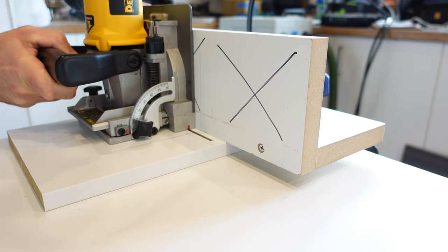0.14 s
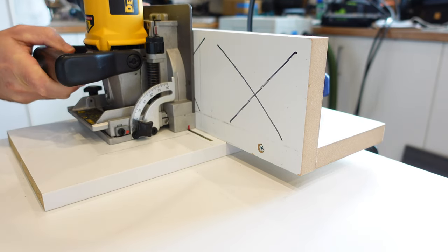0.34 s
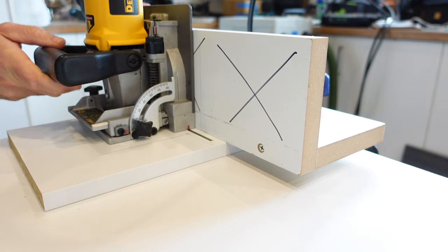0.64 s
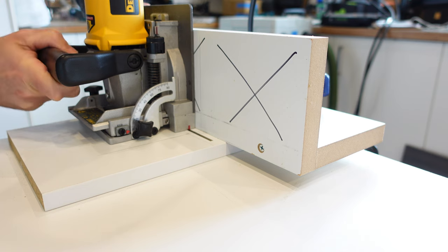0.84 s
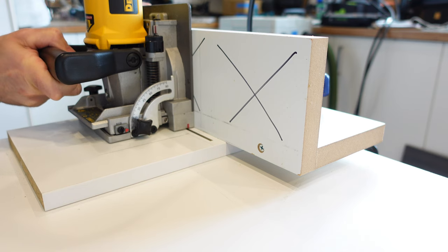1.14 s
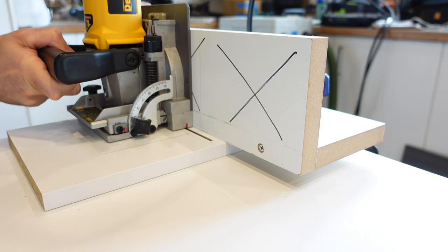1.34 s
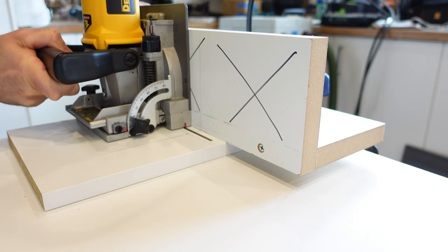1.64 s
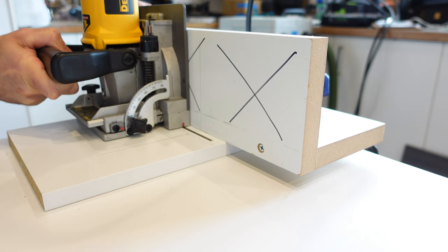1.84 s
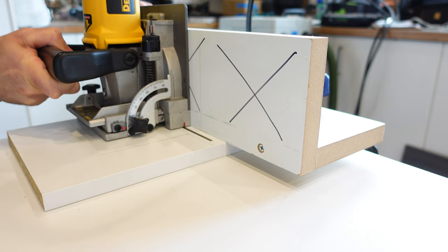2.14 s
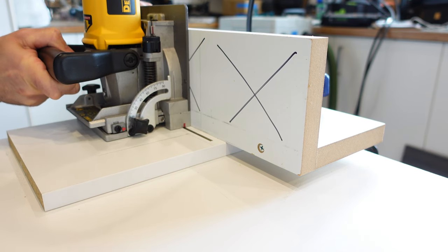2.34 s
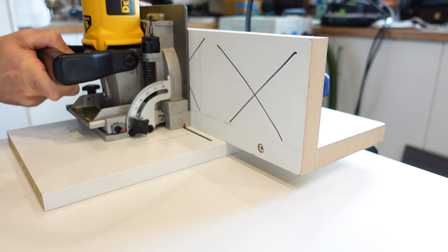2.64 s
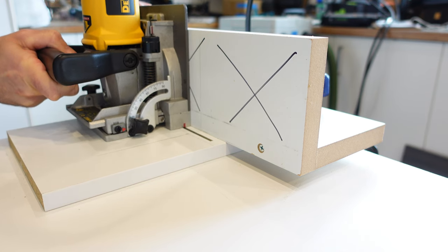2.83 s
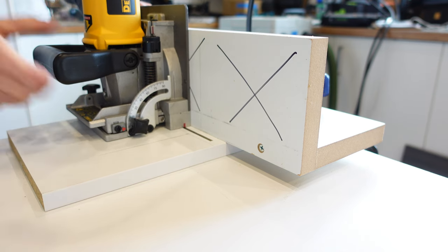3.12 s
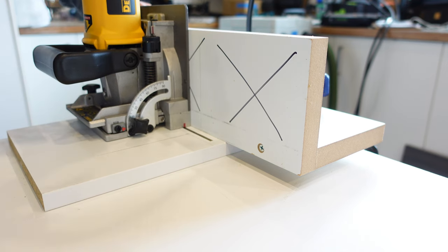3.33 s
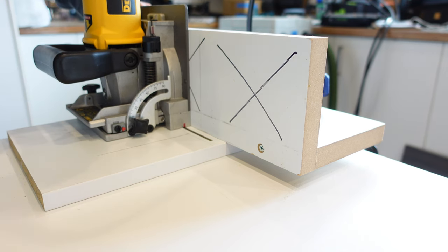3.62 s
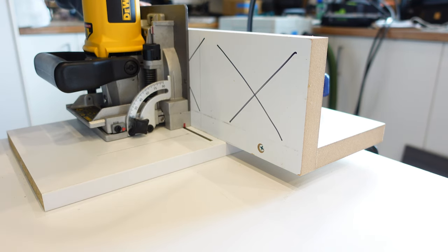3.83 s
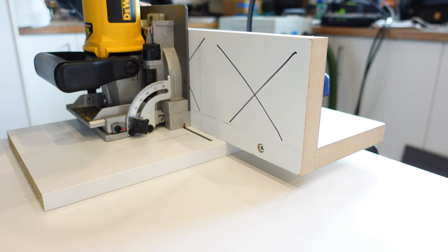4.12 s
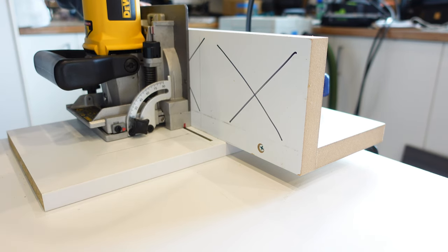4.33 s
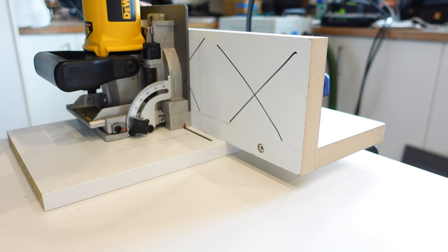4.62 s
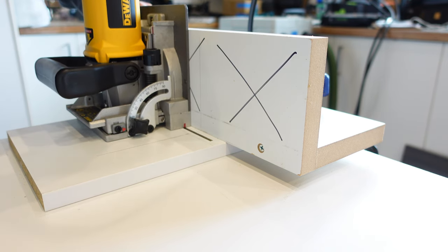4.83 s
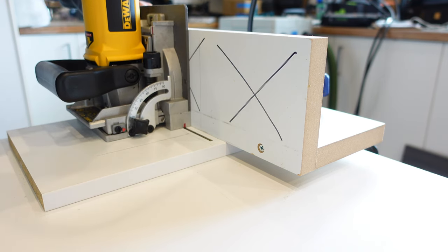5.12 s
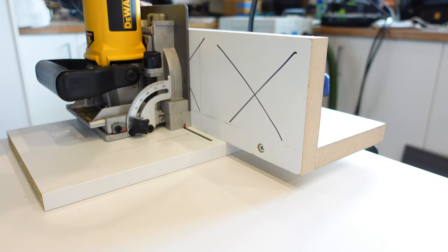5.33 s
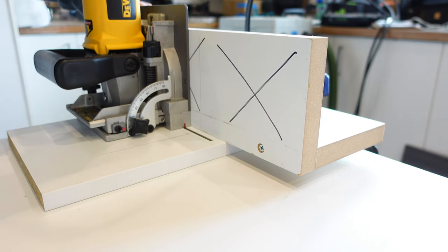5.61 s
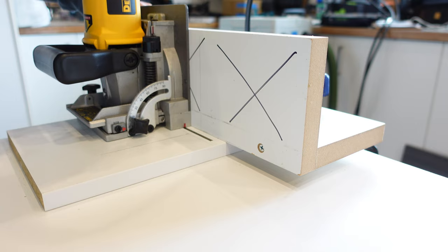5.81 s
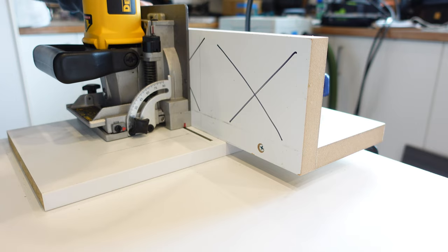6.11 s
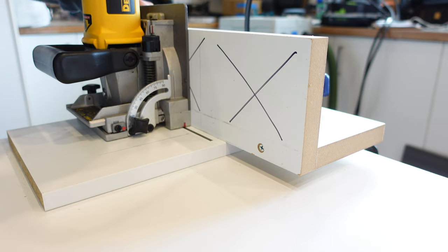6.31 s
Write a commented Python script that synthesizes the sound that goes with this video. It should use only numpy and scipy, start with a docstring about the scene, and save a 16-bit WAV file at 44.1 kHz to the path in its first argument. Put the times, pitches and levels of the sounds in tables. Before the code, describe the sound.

A biscuit jointer is handled with soft knocks and clicks, then runs briefly with a rushing whine before winding down.

```python
"""A biscuit jointer stands on a board in a small workshop. A hand shifts its grip, knocks the tool
lightly and slides off; each impact excites the modes of tool and board. At 4.2 s the switch snaps:
the motor jerks the gears, and the blade whines up to speed in rushing air and brush hiss.
From 4.5 s a dust extractor winds up behind it. At 5.7 s the power is cut and the blade coasts
down, its pitch falling as the gears go slack and chatter."""
import sys
import numpy as np
from scipy import signal
from scipy.fft import rfft, irfft, next_fast_len
from scipy.io import wavfile
from scipy.ndimage import uniform_filter1d, map_coordinates

SR = 44100
rng = np.random.default_rng(int(sys.argv[2]) if len(sys.argv) > 2 else 0)


def wav_out(sig):
    """Save sig, one row per channel (or a flat mono array), as 16-bit PCM at SR to the path in sys.argv[1]."""
    wavfile.write(sys.argv[1], SR, np.round(np.clip(np.atleast_2d(sig).T, -1, 1) * 32767).astype(np.int16))


N = 284886
START_S, CUT_S = 4.216, 5.67  # power on, power off
NOISE_BUILD_S = 0.044  # rise of fan noise and chatter after the switch


def amp(db):
    """Decibels to amplitude ratio."""
    return 10 ** (np.asarray(db) / 20)


def unit(x):
    """Normalise to rms 1."""
    return x / np.sqrt(np.mean(x ** 2) + 1e-20)


def along(points, hz):
    """Interpolate (frequency, value) points on a logarithmic axis."""
    f, v = np.transpose(points)
    return np.interp(np.log(hz + 1), np.log(f + 1), v)


def clock():
    """The time of every sample [s]."""
    return np.arange(N) / SR


def since(start):
    """Seconds elapsed after start, zero before."""
    return np.maximum(clock() - start, 0)


def ramp(start, length):
    """Linear rise from 0 to 1 over length seconds."""
    return np.clip((clock() - start) / length, 0, 1)


def wobble(rate):
    """Random modulation: a spline through rate knots a second."""
    coarse = clock()[::16]
    knots = rng.standard_normal(int(N * rate / SR) + 4)
    return np.interp(clock(), coarse, map_coordinates(knots, [coarse * rate]))


def filtered(x, response):
    """Linear filtering: the spectrum of x times a frequency response."""
    size = next_fast_len(N + SR // 2)
    return irfft(rfft(x, size) * response(np.fft.rfftfreq(size, 1 / SR)), size)[:N]


def resonances(peaks, hz):
    """Gain of Lorentzian peaks that add in power."""
    return np.sqrt(sum((amp(db) / (1 + ((hz - centre) / width) ** 2)) ** 2
                       for centre, width, db in peaks))


def rush(spectrum, patchy_db):
    """Coloured noise of rms 1, modulated in random patches of time and frequency."""
    z = signal.stft(rng.standard_normal(N), nperseg=512)[2]
    patches = uniform_filter1d(rng.standard_normal(z.shape), size=5, axis=0)
    patches = uniform_filter1d(patches, size=9, axis=1)
    noise = signal.istft(z * amp(patchy_db * unit(patches)), nperseg=512)[1][:N]
    return unit(filtered(noise, lambda hz: amp(along(spectrum, hz))))


def blow(damping, crack_db, crack_t60):
    """Impulse response of tool and board: damped modes of random strength, and a short crack."""
    # modes (frequency [Hz], level [dB], t60 before division by damping [s])
    modes = [(133, 5, 0.6), (139, -0.5, 0.29), (241, 4.5, 0.087), (285, -28, 0.043), (386, 2, 0.023),
             (530, -8.5, 0.047), (638, 5.5, 0.027), (791, 0, 0.06), (806, -2.5, 0.027), (1195, 7.5, 0.036),
             (1514, 9.5, 0.023), (1737, -8.5, 0.066), (1960, -13, 0.031), (2330, 2, 0.042),
             (2810, -2, 0.044), (3690, 5.5, 0.0071), (4180, 3.5, 0.026), (4600, 4.5, 0.028),
             (5060, 17, 0.018), (5460, -24, 0.014), (7720, 1, .03), (8800, 3, 0.032)]
    t = np.arange(SR // 4) / SR
    ring = 0
    for hz, db, t60 in modes:
        envelope = amp(db + rng.normal(0, 3) - 60 * t * damping / t60) * rng.choice([-1, 1])
        ring += envelope * np.sin(2 * np.pi * hz * rng.normal(1, 0.031) * t)
    crack = signal.lfilter([1], [1, -.6], rng.standard_normal(len(t)))
    return ring + amp(crack_db - 60 * t / crack_t60) * crack


def impacts(rate, scatter_db, **contact):
    """Shot noise: randomly timed, uneven impulses excite tool and board."""
    pulses = (rng.random(N) < rate / SR) * amp(scatter_db * np.clip(rng.standard_normal(N), -2, 2))
    return signal.fftconvolve(pulses, blow(**contact))[:N]


def background():
    """Ambient noise of the workshop: steady and broadband."""
    # noise spectrum (frequency [Hz], relative density [dB])
    spectrum = [(25, -48), (60, -8), (120, 0.5), (300, -2.5), (800, -6.5), (2000, -17.5), (6000, -23),
                (16000, -32)]
    return amp(-74) * rush(spectrum, patchy_db=.8)


def reverberation(x):
    """The workshop's diffuse field decays exponentially, each frequency at its own rate."""
    # reverberation times (frequency [Hz], t60 [s])
    decay_times = [(100, 0.54), (260, 0.45), (700, 0.25), (2000, 0.21), (5000, 0.25), (14000, 0.074)]
    hz, t, z = signal.stft(rng.standard_normal(SR // 2), SR, nperseg=256)
    tail = signal.istft(z * amp(-60 * t / along(decay_times, hz)[:, None]), SR, nperseg=256)[1]
    return signal.fftconvolve(x, np.pad(tail, (SR // 200, 0)) / np.linalg.norm(tail))[:N]


def extractor():
    """Rotational tone: the dust extractor's turbine radiates its shaft rate and the octave."""
    # shaft tone before the fade-in (time [s], level [dB])
    levels = [(4.85, -73), (4.97, -44.5), (5.1, -45.5), (6.05, -48.5), (6.46, -39)]
    start_s, spin_up_s, full_hz = 4.519, .349, 605
    shaft_db = np.interp(clock(), *np.transpose(levels))
    shaft_hz = full_hz * (1 - np.exp(-since(start_s) / spin_up_s))
    phase = 2 * np.pi * np.cumsum(shaft_hz * (1 + 0.0014 * wobble(24.44))) / SR
    tone = np.sin(phase) + amp(-10) * np.sin(2 * phase)
    return ramp(start_s, spin_up_s) * amp(shaft_db + 2 * wobble(17)) * tone


def strokes():
    """Grainy band noise in Gaussian swells: strokes of skin, sleeve and metal, booms of the board."""
    # swells (peak time [s], time spread [s], centre [Hz], band spread [octaves], level [dB])
    swells = [(0.117, 0.009, 2660, 0.38, -57.5), (0.32, 0.11, 4020, 0.33, -70),
              (1.282, 0.016, 3300, 0.74, -56.5), (1.321, 0.0048, 1630, .12, -37),
              (1.35, 0.065, 1640, 0.26, -63.5), (1.769, 0.021, 1100, 1.1, -64),
              (1.996, .029, 140, .35, -55), (2.385, 0.023, 440, 0.69, -72), (2.655, .025, 134, .37, -59),
              (2.949, 0.039, 740, 0.64, -62), (2.985, 0.026, 147, 1.04, -58),
              (3.2, 0.051, 6000, 0.47, -73.5), (3.81, 0.02, 2780, 0.37, -65)]
    out = np.zeros(N + SR)
    t = np.arange(SR) / SR
    hz = np.fft.rfftfreq(SR, 1 / SR)
    for peak_s, spread_s, centre_hz, octaves, db in swells:
        grains = rng.standard_normal(SR) * amp(2.5 * np.repeat(rng.standard_normal(SR // 50), 50))
        passband = np.exp(-.5 * (np.log2((hz + 1) / centre_hz) / octaves) ** 2)
        band = unit(irfft(rfft(grains) * passband, SR))
        start = max(peak_s - .5, 0)
        envelope = np.exp(-.5 * ((t + start - peak_s) / spread_s) ** 2)
        out[round(start * SR):][:SR] += amp(db) * band * envelope
    return out[:N]


def hand():
    """Stick-slip friction: skin drags and bumps over the hollow handle; the sleeve swishes along."""
    # hand moves (start [s], length [s], rub level [dB], bump weight [dB], swish weight [dB])
    moves = [(-0.05, 0.46, -56.5, -4.5, -6), (0.434, 0.41, -64.5, -2.5, -8.5),
             (0.9, 0.86, -63.5, -0.5, -11.5), (1.733, 0.27, -61, 4.5, -12), (2.774, 0.29, -71, 0, -1.5),
             (3.128, 0.33, -72, 9.5, 4.5), (3.346, 0.33, -70, 5, 6.5), (3.745, 0.08, -64.5, 7, 0.5),
             (3.86, 0.42, -74, 4.5, 0.5)]
    # spectra of bumping, rubbing and swishing (frequency [Hz], relative density [dB])
    bump_spectrum = [(25, -42), (55, -42), (85, -29), (105, -0.5), (140, -2.5), (200, -1), (350, -4.5),
                     (550, -7.5), (1200, -67)]
    rub_spectrum = [(200, -14), (400, 2), (600, 3), (790, 6), (1000, -1), (1400, -6.5), (2000, -14),
                    (4000, -62)]
    swish_spectrum = [(800, -18), (1600, 1.5), (2400, 1), (3800, 0), (6000, -9), (8000, -14),
                      (11000, -19.5), (16000, -35)]
    attack_s, release_s = 0.034, 0.083
    rubbing = bumping = swishing = 0
    for start, length, db, bump_db, swish_db in moves:
        move = amp(db) * ramp(start, attack_s) * np.exp(-since(start + length) / release_s)
        rubbing = np.hypot(rubbing, move)  # incoherent sounds add in power
        bumping = np.hypot(bumping, amp(bump_db) * move)
        swishing = np.hypot(swishing, amp(swish_db) * move)
    slips = unit(impacts(rate=90, scatter_db=6.5, damping=5.1, crack_db=1, crack_t60=0.0027))
    bump = bumping * amp(-3 + 0.89 * wobble(33)) * rush(bump_spectrum, patchy_db=2.5)
    rub = rubbing * (rush(rub_spectrum, patchy_db=4) + amp(-23) * slips)
    swish = swishing * amp(-5 + 0.66 * wobble(27.25)) * rush(swish_spectrum, patchy_db=-1)
    return bump + rub + swish


def knocks():
    """Impact excitation: soft contacts thump the board, hard ones reach the metal's high modes."""
    # knocks, clicks and the switch (time [s], level [dB], centre [Hz], fall to each side [dB/octave])
    contacts = [(0.115, -53, 1790, 6), (0.83, -58.5, 1030, 9), (0.847, -38.5, 670, 6.5),
                (0.873, -64, 530, 9.0), (0.931, -55, 1690, 11), (0.968, -51, 1390, 4),
                (1.033, -60.5, 660, 12), (1.061, -62.5, 690, 13), (1.138, -36, 680, 9.5),
                (1.155, -50, 3900, 4), (1.223, -56, 760, 10), (1.264, -40.5, 1630, 10.5),
                (1.315, -38.5, 1490, 12.5), (1.488, -59.5, 740, 8.5), (1.635, -43, 1060, 7),
                (1.714, -58.5, 600, 7), (1.811, -44, 490, 14), (1.901, -59, 5480, 10),
                (1.954, -51.5, 870, 4.5), (1.96, -37.5, 420, 11), (2.375, -60, 240, 5.5),
                (2.624, -45.5, 385, 8.5), (2.749, -61.5, 230, 4.0), (2.844, -61.5, 1000, 3),
                (2.953, -54, 400, 6.5), (3.396, -58.5, 260, 9), (3.434, -58.5, 520, 2.5),
                (3.714, -45, 395, 7.0), (4.175, -64, 480, 3.5), (4.208, -39, 3400, 6),
                (4.2125, -28.5, 1800, 6.5)]
    # how well the tool radiates a knock (frequency [Hz], gain [dB])
    radiation = [(120, 6), (280, -0.3), (630, 2.4), (1380, 0.0), (2830, -0.5), (5480, 0.5), (10250, -8)]
    # loose parts settling after a knock (frequency [Hz], level relative to the knock [dB])
    loose_parts = [(130, -6), (280, -14), (650, -19), (1800, -11.5), (10000, -28)]
    # edges of the bands that shape a knock (frequency [Hz])
    edges = [80, 190, 420, 950, 2000, 4000, 7500, 12500]
    build_cycles, strike_s, settle_t60 = 1.27, 0.016, 0.27
    bands = list(zip(edges, edges[1:]))
    filters = [signal.butter(2, band, "bandpass", fs=SR, output="sos") for band in bands]
    band_hz = np.sqrt(np.prod(bands, axis=1))
    out = np.zeros(N + SR)
    for start, db, centre_hz, fall in contacts:
        hit = blow(damping=2.13, crack_db=10.5, crack_t60=0.012)
        t = np.arange(len(hit)) / SR
        # the softer the contact, the longer the tool takes to get moving
        hit *= 1 - np.exp(-(t * centre_hz / build_cycles) ** 2)
        levels = db - fall * np.abs(np.log2(band_hz / centre_hz)) + along(radiation, band_hz)
        for sos, hz, level in zip(filters, band_hz, levels):
            strike = signal.sosfilt(sos, hit)
            strike *= np.sqrt(strike_s * SR) / np.linalg.norm(strike)  # energy of rms 1 for strike_s
            noise = unit(signal.sosfilt(sos, rng.standard_normal(len(t))))
            settling = amp(along(loose_parts, hz) - 60 * t / settle_t60) * noise
            out[round(start * SR):][:len(t)] += amp(level) * (strike + settling)
    return out[:N]


def drive():
    """First-order run-up and frictional decay: tooth rate [Hz]; torque, coasting, gear slack [0-1]."""
    spin_from_s, spin_up_s, coast_from_s, coast_s = 4.193, .1594, 5.72, 1.418
    running_hz, creep_hz_per_s = 783.7, 74.5
    powered_s = np.clip(clock(), spin_from_s, coast_from_s) - spin_from_s
    torque = np.exp(-powered_s / spin_up_s)  # falls as the motor gains speed
    run_down = np.exp(-since(coast_from_s) / coast_s)
    tooth_hz = (running_hz * (1 - torque) + creep_hz_per_s * powered_s) * run_down
    coasting = ramp(CUT_S, length=.2)  # the load leaves the gears
    slack = ramp(start=6.015, length=0.46)
    return tooth_hz, torque, coasting, slack


def mains_ripple():
    """Oscillation at twice the mains frequency, until the power is cut."""
    return (clock() < CUT_S) * np.sin(2 * np.pi * 100 * clock())


def rattle():
    """Backlash: gear teeth slap across their play, loudest on run-up."""
    # transmission of chatter through the housing (frequency [Hz], gain [dB])
    transmission = [(30, -45), (200, -33), (450, 6), (900, -5), (3200, 2), (6000, -13.5), (9500, -4.5),
                    (13000, -7.5), (16000, -28)]
    _, _, coasting, slack = drive()
    unseated = 1 - ramp(start=4.49, length=0.19)
    # softens when the power is cut, then returns to about its running level as the gears slow
    rattle_db = -47 + 10.5 * unseated - 5.5 * coasting + 5 * slack ** 2
    slaps = sum(impacts(rate=80, scatter_db=3.5, damping=5, crack_db=11, crack_t60=.005)
                for _ in range(4))
    chatter = unit(filtered(slaps, lambda hz: amp(along(transmission, hz))))
    return ramp(START_S, NOISE_BUILD_S) * amp(rattle_db) * chatter


def brushes():
    """Sliding friction: brushes scrape the commutator, surge with the mains and make the metal sing."""
    # brush hiss (frequency [Hz], relative density [dB])
    spectrum = [(2500, -32), (4200, 1.5), (4700, 2), (5400, 1), (6100, 2.5), (6600, -4.5), (7500, -4.5),
                (8200, -8), (9300, -8.5), (10300, -13.5), (12300, -19), (13200, -25), (14500, -21.5),
                (16000, -34)]
    # resonances of metal parts (frequency [Hz], half-width [Hz], gain [dB])
    metal_modes = [(5420, 160, -9), (6030, 40, 6), (7620, 50, -9), (8850, 240, -3), (9515, 70, 0),
                   (11610, 130, -6), (12400, 110, -11)]
    fade_s = 0.31
    torque = drive()[1]
    hiss_db = -41.5 - 11.5 * torque - 8.5 * ramp(CUT_S - fade_s / 3, fade_s)
    ringing = unit(filtered(rng.standard_normal(N), lambda hz: resonances(metal_modes, hz)))
    singing = amp(-2 - 6.5 * since(START_S)) * ringing
    surge = 1 + 0.3 * mains_ripple()
    sparking_db = (.5 + 1.04 * (clock() < CUT_S)) * wobble(120)
    return amp(hiss_db + sparking_db) * surge * (rush(spectrum, patchy_db=1) + singing)


def windage():
    """Turbulence: blade and fan churn the air into noise, which turns duller when the motor coasts."""
    # churned air, driven fan and coasting fan (frequency [Hz], relative density [dB])
    air_spectrum = [(25, -53), (65, -63), (110, -24), (250, -13.5), (380, -9), (480, -5.5), (620, 0),
                    (800, 6), (950, -2.5), (1200, -17.5), (2000, -24), (4000, -72)]
    driven_spectrum = [(600, -33), (1000, -1), (1350, -1.5), (1650, -1.5), (2050, -6.5), (2500, -2),
                       (2850, 2), (3350, 3), (3800, -4), (4300, -13), (5500, -4.5), (9000, -72)]
    coasting_spectrum = [(600, -22), (1000, -1), (1250, 3.5), (1650, 0), (2000, -8), (2500, -5.5),
                         (2950, -1), (3400, -3), (3900, -12), (4400, -8.5), (5500, -12.5), (9000, -70)]
    _, torque, coasting, slack = drive()
    kick = np.exp(-np.abs(clock() - START_S) / 0.016)  # the motor's first jerk
    swell = np.exp(-((clock() - 5.42) / 0.66) ** 2)  # the roar grows at full speed
    air_db = -39.5 - 3.5 * torque - 3.5 * coasting + 6 * slack + 16.5 * kick
    fan_db = -36.5 - 4.5 * torque - 1.5 * coasting + 5.5 * slack + 2 * swell
    air = amp(air_db + 0.41 * wobble(35)) * rush(air_spectrum, patchy_db=0.5)
    fan = np.sqrt(1 - coasting) * rush(driven_spectrum, patchy_db=0.53)
    fan += amp(-3.5) * np.sqrt(coasting) * rush(coasting_spectrum, patchy_db=1.8)
    return air + np.sqrt(ramp(START_S, NOISE_BUILD_S)) * amp(fan_db + wobble(60)) * fan


def tooth_phase():
    """Phase as the integral of tooth rate; the shaft judders under the first surge of torque."""
    judder = .0005 + .1 * np.exp(-np.abs(clock() - START_S) / .055)
    return 2 * np.pi * np.cumsum(drive()[0] * (1 + judder * wobble(200))) / SR


def partial(phase, db, flutter):
    """A sinusoid modulated in amplitude and phase by turbulence."""
    in_phase = (1 + flutter * wobble(70)) * np.sin(phase)
    quadrature = flutter * wobble(70) * np.cos(phase)
    return np.sqrt(2) * amp(db) * (in_phase + quadrature)


def unbalance(phase):
    """Rotating unbalance: the six-toothed blade and the armature each vibrate once per turn."""
    tooth_hz = drive()[0]
    blade = partial(phase / 6, db=-67.5, flutter=0.48)
    armature = partial(7 / 13 * phase, db=-53, flutter=0.42)
    return (tooth_hz / tooth_hz.max()) ** 6 * (blade + armature)


def gear_mesh(phase):
    """Forced vibration: meshing at seven times the tooth rate sweeps through the case's resonances."""
    # gear case resonances (frequency [Hz], half-width [Hz], level [dB])
    case_modes = [(1750, 450, -35), (2950, 200, -34), (4200, 250, -56), (5280, 250, -41.5),
                  (5700, 600, -58), (6035, 50, -44), (6250, 90, -52)]
    tooth_hz, _, coasting, slack = drive()
    loaded_db = 20 * np.log10(resonances(case_modes, 7 * tooth_hz))
    mesh_db = (1 - coasting) * loaded_db - 48 * coasting - 9 * slack ** 5  # evens out when unloaded
    mesh = partial(7 * phase, mesh_db, flutter=.33 - .18 * coasting)
    octave = partial(14 * phase, -66.5 - 4 * coasting + 3.5 * wobble(8), flutter=.33)
    return mesh + octave


def blade_whine(phase):
    """Siren principle: the teeth chop the air into a harmonic series on their passing rate."""
    # overtones of the tooth tone (multiple [1], relative level [dB])
    harmonics = [(2, 0.5), (3, -3), (4, -1), (5, 0), (6, -1)]
    # colouring of the overtones by the blade housing (frequency [Hz], gain [dB])
    housing = [(600, -8), (1100, -1), (1600, 0), (1850, -6), (2200, -16), (2650, -7), (3000, -6),
               (3500, -22), (5000, -20)]
    tooth_hz, torque, coasting, slack = drive()
    # the tone drops out for about half a second, as if notched by a noise suppressor
    dropout_db = -17.5 * (ramp(4.95, 0.036) - ramp(5.355, .28))
    tooth_db = -35 - 44 * torque + 2 * coasting - 6 * slack + dropout_db
    overtone_db = -51.5 + 14.5 * np.sqrt(coasting) + .5 * dropout_db
    overtones = sum(partial(k * phase, overtone_db + db + along(housing, k * tooth_hz), flutter=0.14)
                    for k, db in harmonics)
    return partial(phase, tooth_db, flutter=0.1) + overtones


def scene():
    """Superposition of handling, the motor from the snap of the switch on, extractor and background."""
    phase = tooth_phase()
    hum = amp(-68) * mains_ripple()
    tones = blade_whine(phase) + gear_mesh(phase) + unbalance(phase) + hum
    motor = ramp(START_S, 0.0036) * (tones + windage() + brushes() + rattle())
    contacts = knocks()
    handling = contacts + amp(-11.5) * reverberation(contacts) + hand() + strokes()
    return handling + motor + extractor() + background()


def record(dry):
    """Soft saturation rounds off the highest peaks; an ideal low-pass limits the band."""
    ceiling_db, top_hz = -20.5, 15750
    rounded = dry / (1 + np.abs(dry / amp(ceiling_db)) ** 6) ** (1 / 6)
    return filtered(rounded, lambda hz: hz < top_hz)


dry = scene()
out = record(dry)
wav_out(out)
```